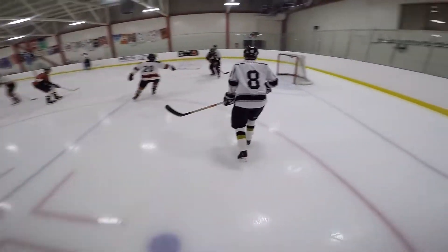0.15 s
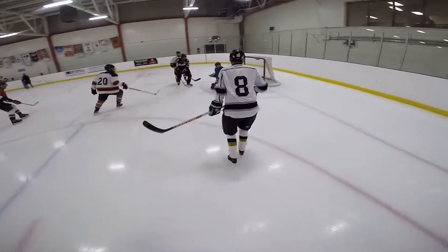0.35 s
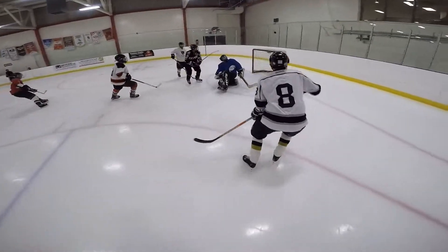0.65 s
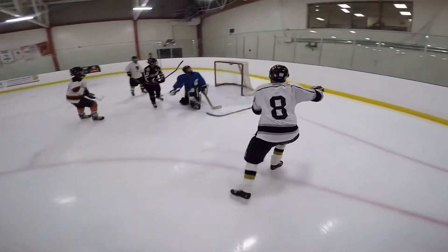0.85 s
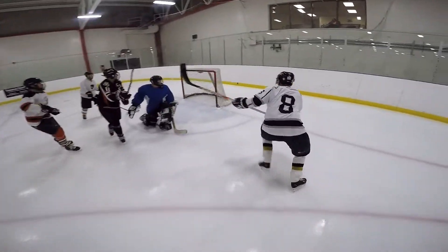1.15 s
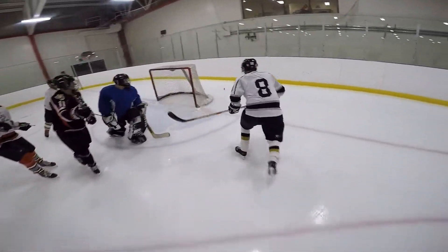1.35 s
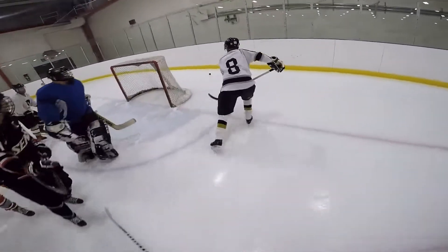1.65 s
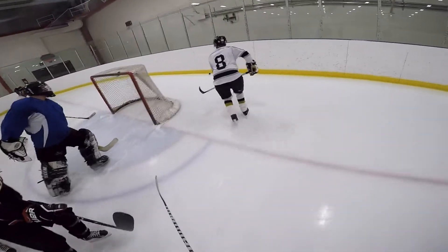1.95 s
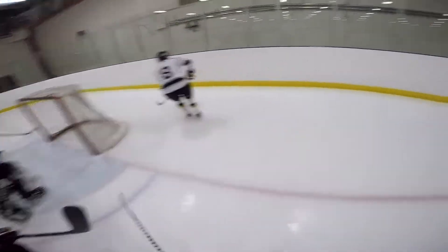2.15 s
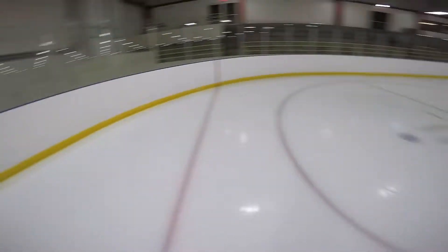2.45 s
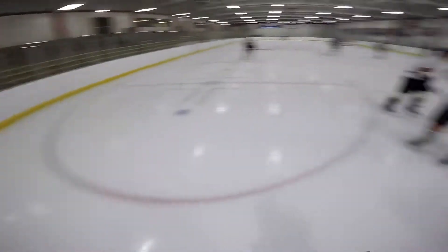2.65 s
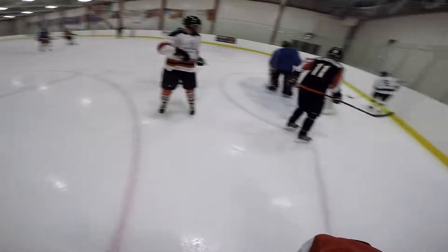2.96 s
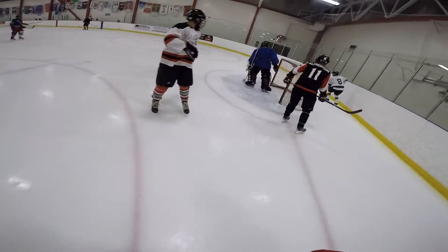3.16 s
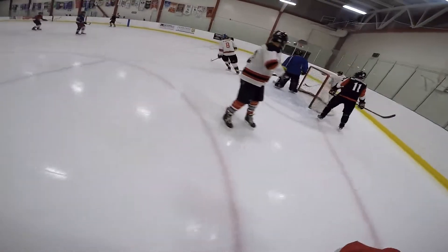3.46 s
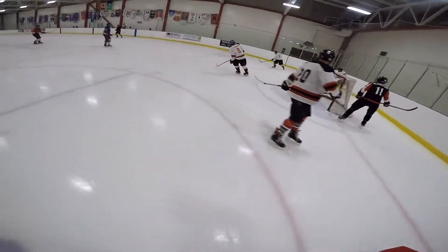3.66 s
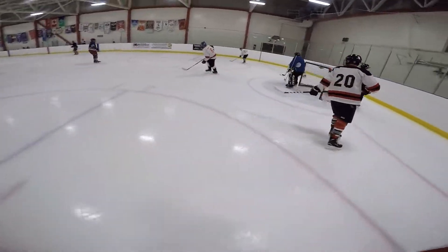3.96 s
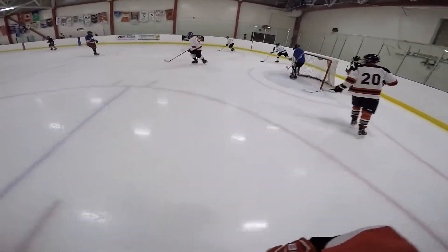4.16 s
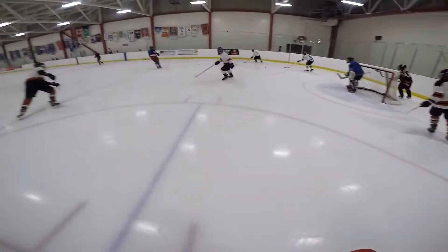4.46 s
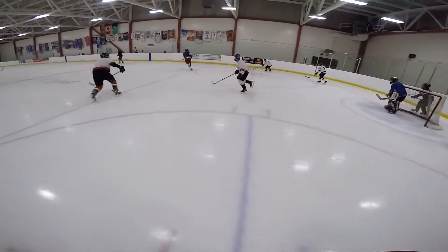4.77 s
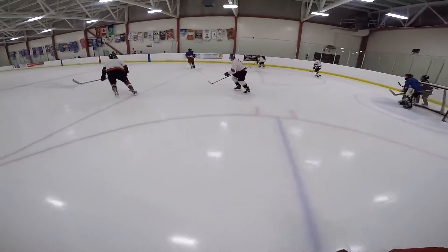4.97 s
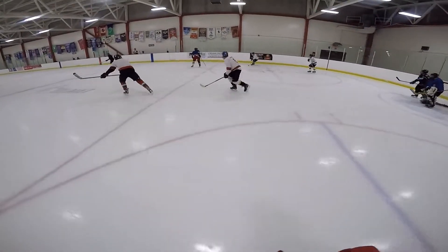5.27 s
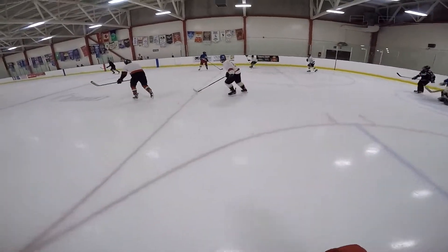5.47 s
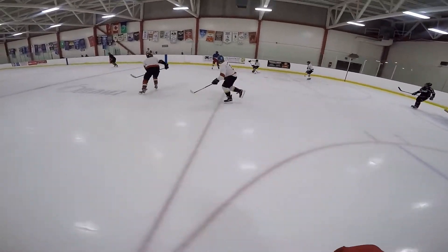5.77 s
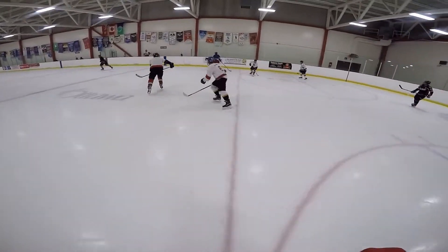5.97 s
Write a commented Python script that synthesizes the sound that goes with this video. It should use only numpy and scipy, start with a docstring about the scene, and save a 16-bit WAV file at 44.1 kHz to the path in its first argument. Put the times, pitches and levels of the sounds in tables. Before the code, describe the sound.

Hockey skates scrape and carve the ice while wind rumbles on the microphone and sharp stick and puck clacks echo around an indoor rink.

```python
"""An indoor ice rink during hockey, heard from a camera in a plastic case on a skater's helmet.
Air hums in the hall, and the skater's own speed blows a rumbling wind over the microphone.
Blades scrape and chip the ice, and boots and sticks land on it with dull thumps.
Sticks, puck and blades hit with sharp clacks that echo round the hall.
The case colours the scrapes and clacks and muffles their treble."""
import sys
import numpy as np
from scipy import signal
from scipy.fft import rfft, irfft, next_fast_len
from scipy.io import wavfile
from scipy.ndimage import uniform_filter1d, map_coordinates

SR = 44100
rng = np.random.default_rng(int(sys.argv[2]) if len(sys.argv) > 2 else 0)


def generate_wav(sig):
    """Save sig (samples, or channels by samples) to the path in sys.argv[1] as 16-bit PCM at SR."""
    pcm = np.round(np.clip(np.atleast_2d(sig).T, -1, 1) * 32767).astype(np.int16)
    wavfile.write(sys.argv[1], SR, pcm)


N = 269892

# how much sound the case lets through (frequency [Hz], gain [dB])
CASE_GAIN = [(300, -7.5), (600, -5.5), (790, -9.5), (950, -2.5), (1400, 1), (1880, -6), (2150, -8),
             (3200, -13.5), (4100, -17.5), (5400, -27), (6800, -27.5), (8000, -37), (10800, -42.5),
             (14500, -44.5)]
# notes at which the air in the case rings (frequency [Hz], width [Hz], boost [dB])
CASE_PEAKS = [(1417, 9.9, 6.5), (1804, 270, 5), (3430, 510, 5.5), (3627, 156, 8.5), (4545, 390, 4.5),
              (6215, 790, 8), (8810, 970, 7)]
# how long the echo lasts (frequency [Hz], time to fade by 60 dB [s])
ECHO_FADE = [(300, 4.9), (1200, 5.4), (2000, 4.1), (3600, 2.1), (6500, 1.7), (12000, 0.25)]
# the tone that the hall's air and walls give the echo (frequency [Hz], gain [dB])
ECHO_COLOUR = [(700, 4), (1900, -3.5), (2700, 3), (3500, -1.5), (4500, -3.5), (6300, -2), (8000, -0.5),
               (13000, 4)]
# the hum of air in the hall (frequency [Hz], relative level [dB])
HUM_SPECTRUM = [(80, -19), (190, 4.5), (280, -0.5), (400, -5), (550, -10), (700, -10.5), (900, -21.5),
                (2000, -9), (8000, -38.5), (13000, -42), (15500, -46)]
# air rushing past as the skater speeds up, turns and coasts (time [s], strength [dB])
AIRFLOW = [(0, -36.5), (0.95, -40), (1.15, -36), (2.15, -36), (2.6, -30.5), (2.95, -33.5), (3.08, -39.5),
           (3.8, -41), (4.05, -35.5), (4.4, -34), (5.35, -36.5), (6.1, -32)]
# the rumble of big swirls of air (frequency [Hz], relative level [dB])
RUMBLE_SPECTRUM = [(8, -4), (22, 4), (36, -4), (47, -2.5), (58, 1), (68, -12.5), (85, -17), (130, -45),
                   (300, -83)]
# the flutter of small swirls (frequency [Hz], relative level [dB])
FLUTTER_SPECTRUM = [(40, -25), (75, -2), (115, -1), (150, -10.5), (230, -21.5), (400, -45.5), (1000, -76)]
# gusts hitting the microphone (middle time [s], length [s], level [dB], pitch [Hz])
GUSTS = [(0.777, 0.17, -23.5, 51.6), (1.214, 0.12, -28.5, 91.5), (1.691, 0.25, -25, 80.6),
         (2.3, 0.11, -36, 97), (2.381, 0.12, -23, 37.7), (2.533, 0.17, -19.5, 40), (4.095, 0.2, -20.5, 33),
         (4.458, 0.13, -21.5, 39.7), (5.096, 0.17, -22.5, 32.4), (5.493, 0.13, -26, 44.7)]
# blades gliding near and far (time [s], level [dB])
GLIDE = [(0, -40.5), (0.8, -42.5), (1.3, -43), (2.3, -43.5), (2.85, -43.5), (3.0, -45.5), (3.7, -45),
         (3.87, -47.5), (4.1, -46.5), (4.7, -45.5), (5.6, -45.5), (6.1, -44.5)]
# skates pushing and carving (time [s], length [s], level [dB], brightness [dB])
STROKES = [(0.49, 0.18, -46, -5), (0.969, 0.18, -51.5, -2), (1.474, 0.14, -45, -1), (1.599, 0.15, -50, 4.5),
           (1.88, 0.11, -43, 3.5), (2.04, 0.08, -47.5, -3), (2.414, 0.12, -47, -2.5),
           (2.524, 0.17, -44, 1.5), (2.73, 0.11, -45, 0.5), (3.039, 0.26, -49, -4.5),
           (3.45, 0.12, -49.5, 4.5), (3.586, 0.092, -48, -4), (4.015, 0.14, -49.5, 2),
           (4.152, 0.062, -42, 1.5), (4.215, 0.11, -47.5, -3.5), (4.52, 0.11, -48, 2),
           (4.847, 0.26, -49.5, 1.5), (5.36, 0.093, -50, 1), (5.57, 0.13, -50, -1), (5.946, 0.07, -54, 7)]
# a blade's grind, scrape and spray (low edge [Hz], high edge [Hz])
BLADE_BANDS = [(600, 2100), (2100, 4200), (4200, 15500)]
# the mix in each of those bands (glide gain [dB], stroke gain [dB], growth with glide [dB/dB], grit [ratio])
BLADE_MIX = [(3.5, 2, 0.95, 0.65), (-1.2, -3, 1.0, 0.3), (-8.5, -7.5, 1.27, 0.53)]
# an edge biting into the ice (time [s], length [s], pitch [Hz], level [dB])
BITES = [(.74, 0.092, 4570, -53), (1.5, 0.22, 6400, -58), (1.687, 0.056, 7060, -56),
         (1.864, 0.035, 6600, -48), (1.918, .02, 6650, -48), (1.933, 0.12, 4340, -44),
         (1.946, 0.067, 3860, -39.5), (2.727, 0.12, 2490, -43), (2.55, 0.46, 3610, -49.5),
         (3.599, 0.053, 3600, -47), (4.143, 0.039, 3500, -38.5), (4.565, 0.04, 3220, -44),
         (5.959, 0.033, 7240, -50.5)]
# boots and sticks landing on the ice (time [s], level [dB], pitch [Hz])
THUMPS = [(0.142, -26.5, 260), (1.3, -36.5, 276), (1.919, -38.5, 293), (2.63, -35, 560), (3.545, -49, 302),
          (4.319, -41, 404), (5.013, -35.5, 388)]
# the notes of a steel blade (frequency [Hz], relative level [dB], time to fade by 60 dB [s])
STEEL_NOTES = [(3660, -16, 0.043), (4460, -11, 0.05), (4900, -8, 0.031), (6600, -16, 0.019),
               (9000, -28, 0.019), (13500, -37, 0.03)]
# a hit's knock, clack, snap and sizzle (low edge [Hz], high edge [Hz])
CLACK_BANDS = [(880, 2100), (2100, 5200), (5200, 10000), (10000, 15500)]
# the mix of those bands in a hit of plain brightness (gain [dB])
CLACK_MIX = [-0.5, 0.5, -10.5, -34]
# sticks, puck and blades hitting (time [s], level [dB], brightness [dB], steel clink level [dB],
# main pitch [Hz], time to fade by 60 dB [s], relative echo gain [dB])
CLACKS = [(0.122, -22.5, -3, -26, 1760, 0.014, 0.5), (0.1417, -22, -0.5, -37, 3020, 0.042, 0.5),
          (0.1561, -22.5, -3, -45, 1750, 0.034, 1), (0.167, -27, -6, -50, 1390, 0.067, -7),
          (0.4737, -32.5, 2, -28, 4900, 0.028, 1), (0.986, -41, 10.5, -22, 4540, 0.041, -13),
          (0.989, -36, 12, -28, 2600, 0.031, -6), (1.021, -45, 13.5, -46, 4400, 0.04, -6),
          (1.3, -40.5, -1.5, -31, 4900, 0.022, -15), (1.9014, -34.5, 3.5, -22.5, 3960, 0.11, -1),
          (2.1936, -40, -7, -53, 1420, 0.018, -7), (2.693, -37.5, -6.5, -62, 1210, 0.018, -8),
          (4.0708, -40, -6.5, -55, 3020, 0.04, 2.5), (5.139, -32, 1.5, -22, 3380, 0.065, -2),
          (5.1562, -33.5, 9, -38, 3760, 0.012, 5), (5.1612, -27, 6.5, -30, 3450, 0.016, 0.5),
          (5.169, -30, 3, -34, 3600, 0.076, 0), (5.175, -29.5, 1.5, -45, 1750, 0.057, 2.5),
          (5.207, -42.5, -2, -54, 1650, 0.044, 1), (5.214, -34, -2.5, -48, 3450, 0.021, -9),
          (5.336, -31.5, 3.5, -22.5, 4150, 0.013, 6.5)]


def amp(db):
    """Turn decibels into a gain."""
    return 10 ** (np.asarray(db) / 20)


def unit(x):
    """Scale a sound to an average (rms) level of 1."""
    return x / np.sqrt(np.mean(x ** 2) + 1e-20)


def at_frequency(points, hz):
    """Read between (frequency, value) points on a log frequency scale."""
    frequencies, values = np.transpose(points)
    return np.interp(np.log(hz + 1), np.log(frequencies + 1), values)


def over_time(points):
    """Join (time, value) points with straight lines, one value per sample."""
    return np.interp(np.arange(N) / SR, *np.transpose(points))


def wobble(rate):
    """A smooth curve through `rate` random values a second."""
    return map_coordinates(rng.standard_normal(int(N * rate / SR) + 4), [np.arange(N) * rate / SR])


def filtered(x, gain_at):
    """Turn each frequency up or down by gain_at(hz)."""
    size = next_fast_len(N + SR // 2)
    return irfft(rfft(x, size) * gain_at(np.fft.rfftfreq(size, 1 / SR)), size)[:N]


def noise(spectrum):
    """Noise shaped by (frequency, level) points."""
    return unit(filtered(rng.standard_normal(N), lambda hz: amp(at_frequency(spectrum, hz))))


def add(track, start, sound):
    """Mix a sound into the track at a start time in seconds."""
    part = track[round(start * SR):][:len(sound)]
    part += sound[:len(part)]


def fade(t, t60):
    """A fall of 60 dB every t60 seconds."""
    return np.exp(-np.log(1000) * t / t60)


def ringing(notes, t):
    """A struck object rings with fading notes, their strengths a little different each time."""
    return sum(amp(db + rng.normal(0, 0.79)) * fade(t, t60) * np.sin(2 * np.pi * hz * t)
               for hz, db, t60 in notes)


def case_ring(band, source_hz=1500, source_db=0, size=4096):
    """How the case rings after a click, within one band; source_db boosts the source's own pitch."""
    hz = np.fft.rfftfreq(size, 1 / SR) + 1
    peaks = list(CASE_PEAKS) + [(source_hz, 0.166 * source_hz, source_db)]
    boost_db = sum(db / (1 + (2 * (hz - centre) / width) ** 2) for centre, width, db in peaks)
    band_cut = np.sqrt((1 + (band[0] / hz) ** 12) * (1 + (hz / band[1]) ** 24))
    gain = amp(at_frequency(CASE_GAIN, hz) + boost_db) / band_cut
    # minimum phase: all the ringing comes after the click, none before
    cepstrum = irfft(np.log(np.maximum(gain, 1e-6)))
    cepstrum[1:size // 2] *= 2
    cepstrum[size // 2 + 1:] = 0
    return irfft(np.exp(rfft(cepstrum)))[:size // 2]


def hall_echo(x, gap_s=0.0039, build_s=0.0035):
    """The rink's long echo builds up after a tiny gap, and its treble dies first."""
    hz, t, spectra = signal.stft(rng.standard_normal(3 * SR), SR, nperseg=256)
    fade_db = -60 * t / at_frequency(ECHO_FADE, hz)[:, None]
    colour_db = at_frequency(ECHO_COLOUR, hz)[:, None]
    tail = signal.istft(spectra * amp(fade_db + colour_db), SR, nperseg=256)[1]
    since_gap = np.maximum(np.arange(len(tail)) / SR - gap_s, 0)
    tail *= 1 - np.exp(-since_gap / build_s)
    return signal.fftconvolve(x, tail / np.linalg.norm(tail))


def ventilation(level_db=-45):
    """Air hums through the hall, wavering slightly."""
    return amp(level_db + 1.6 * wobble(9)) * noise(HUM_SPECTRUM)


def swirls(spectrum, evenness):
    """Swirling air makes a low noise; more evenness flattens its swells."""
    air = noise(spectrum)
    swell = np.sqrt(np.abs(uniform_filter1d(air ** 2, 3000)) + 1e-6)
    return unit(air / swell ** evenness)


def gusts():
    """Each gust is a short swell of swirls of about one size."""
    out = np.zeros(N)
    for middle, length, db, hz in GUSTS:
        air = swirls([(hz / 8, -44), (hz, 0), (hz * 4, -44), (hz * 32, -132)], evenness=0.67)
        swell = np.sqrt(np.hanning(round(length * SR)))
        add(out, middle - length / 2, amp(db) * swell * air[SR:][:len(swell)])
    return out


def wind(cruise_db=-35, rumble_growth=0.52, waver_db=1.55):
    """Big swirls rumble on the microphone; small ones flutter and follow the airflow more strongly."""
    flow_db = over_time(AIRFLOW)
    rumble_db = -29.5 + rumble_growth * (flow_db - cruise_db) + waver_db * wobble(5.3)
    rumble = amp(rumble_db) * swirls(RUMBLE_SPECTRUM, evenness=0.89)
    flutter = amp(flow_db - 3) * swirls(FLUTTER_SPECTRUM, evenness=0.54)
    return rumble + flutter + gusts()


def ice_chips(per_second, spread_db=4.5):
    """Ice breaks under an edge in scattered clicks of uneven size."""
    breaks = rng.random(N) < per_second / SR
    signs = rng.choice([-1, 1], N)
    sizes = amp(spread_db * np.clip(rng.standard_normal(N), -2, 2))
    return unit(breaks * signs * sizes)


def stroke_shape(start, length, attack_s=0.015, release_s=0.041):
    """The strength of one push: the edge digs in, holds and lets go."""
    t = np.arange(N) / SR - start
    return np.clip(t / attack_s, 0, 1) * np.exp(-np.clip(t - length, 0, 1) / release_s)


def blades(usual_glide_db=-45):
    """Edges glide and push on the ice, both chipping it with the same gritty scrape; all of it sounds through
    the case."""
    out = np.zeros(N)
    chatter_db = 0.56 * wobble(45)
    crunch = ice_chips(per_second=1400)
    extra_glide_db = over_time(GLIDE) - usual_glide_db
    strokes = [(stroke_shape(start, length), db, bright_db) for start, length, db, bright_db in STROKES]
    for tilt, band, (glide_db, stroke_db, growth, grit) in zip((-1, 0, 1), BLADE_BANDS, BLADE_MIX):
        glide_power = amp(usual_glide_db + glide_db + growth * extra_glide_db) ** 2
        stroke_power = sum((amp(db + stroke_db + tilt * bright_db) * shape) ** 2
                           for shape, db, bright_db in strokes)
        friction = rng.standard_normal(N) + grit * crunch
        scrape = unit(signal.fftconvolve(friction, case_ring(band))[:N])
        flicker = amp(chatter_db + 0.48 * wobble(14))
        out += np.sqrt(glide_power + stroke_power) * flicker * scrape
    return out


def edge_bites(echo_db=-8):
    """Bursts of chipping ice make a blade sing around one pitch."""
    out = np.zeros(N)
    friction = rng.standard_normal(N) + ice_chips(per_second=420)
    for start, length, hz, db in BITES:
        burst = friction[round(start * SR):][:round(length * SR)]
        resonance = signal.iirpeak(hz, Q=6, fs=SR)
        tone = unit(signal.lfilter(*resonance, signal.lfilter(*resonance, burst)))
        add(out, start, amp(db) * tone * np.sqrt(np.hanning(len(tone))))
    return out + amp(echo_db) * hall_echo(out)[:N]


def thumps(rise_s=0.00047, decay_s=0.0094):
    """A soft blow on the ice starts three low notes that die almost at once."""
    out, t = np.zeros(N), np.arange(4000) / SR
    shape = np.exp(-t / decay_s) * (1 - np.exp(-t / rise_s))
    for start, db, hz in THUMPS:
        body = sum(share * np.sin(2 * np.pi * (hz * ratio * t + rng.random()))
                   for ratio, share in [(0.7, 0.61), (1, 0.95), (1.45, 0.71)])
        add(out, start, amp(db) * body * shape)
    return out


def stick_ring(start_s=5.208, level_db=-34, echo_db=-1):
    """Something hard, likely a stick shaft, rings on after a shot, and the hall holds its note."""
    out, t = np.zeros(N), np.arange(24000) / SR
    note = amp(level_db) * ringing([(1414, 0, 0.51), (1900, -20, 0.22)], t)
    add(out, start_s, note)
    add(out, start_s, amp(echo_db) * hall_echo(note))
    return out


def clacks(crack_db=4, crack_s=0.0013, pitch_band_db=4, hall_db=-3, attack_samples=220):
    """Each hit is a crack and a short noisy ring, with a clink of steel; the hall echoes it."""
    out, t = np.zeros(N), np.arange(6000) / SR
    plain_rings = [case_ring(band) for band in CLACK_BANDS]
    tilt = np.arange(len(CLACK_BANDS)) - 1  # a harder contact has more treble
    for start, db, bright_db, clink_db, hz, t60, echo_db in CLACKS:
        holds_pitch = np.array([low <= hz < high for low, high in CLACK_BANDS])
        levels_db = db + np.array(CLACK_MIX) + bright_db * tilt + pitch_band_db * holds_pitch
        force = fade(t, t60) + amp(crack_db) * np.exp(-t / crack_s)
        # the levels set the start of the hit; a slower fade adds energy after it
        total_to_attack = np.sum(force ** 2) / np.sum(force[:attack_samples] ** 2)
        strengths = amp(levels_db) * np.sqrt(attack_samples * total_to_attack)
        for band, strength in zip(CLACK_BANDS, strengths):
            burst = force * rng.standard_normal(len(t))
            hit = signal.fftconvolve(burst, case_ring(band, hz, source_db=12))
            add(out, start, strength * hit / np.linalg.norm(hit))
        add(out, start, amp(clink_db) * ringing(STEEL_NOTES, t))
        # the hall gathers the hit from all directions, so its tone is smoother
        gathered = sum(strength * ring / np.linalg.norm(ring)
                       for ring, strength in zip(plain_rings, strengths))
        add(out, start, amp(echo_db + hall_db) * hall_echo(gathered))
    return out


def scene():
    """All the sounds meet at one microphone."""
    return (wind() + blades() + edge_bites() + clacks() + stick_ring() + thumps() + ventilation())[None]


def record(dry, top_hz=15200):
    """The camera cuts off the very highest treble."""
    return filtered(dry[0], lambda hz: hz < top_hz)[None]


dry = scene()
out = record(dry)
generate_wav(out)
```